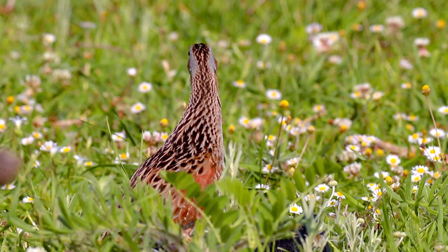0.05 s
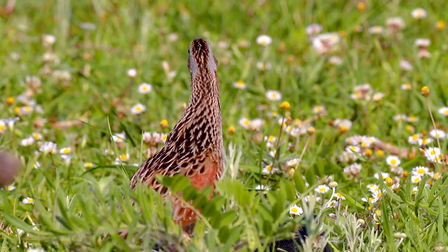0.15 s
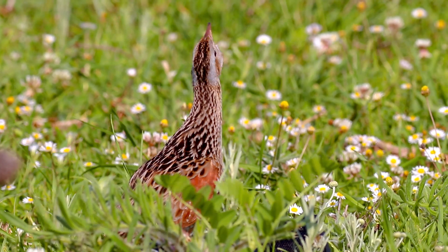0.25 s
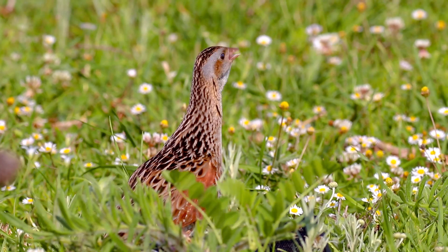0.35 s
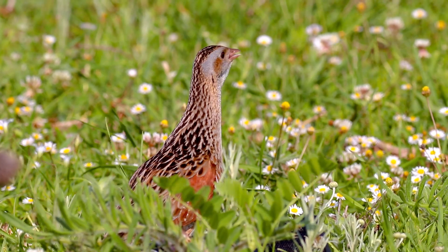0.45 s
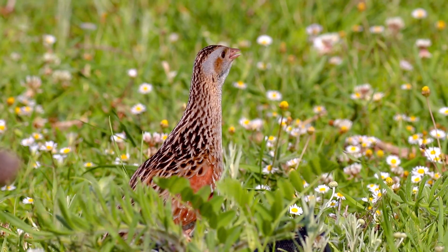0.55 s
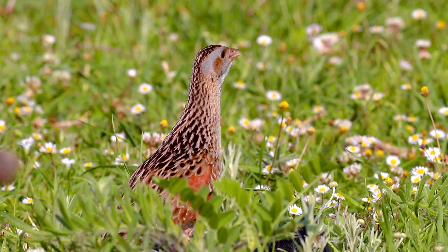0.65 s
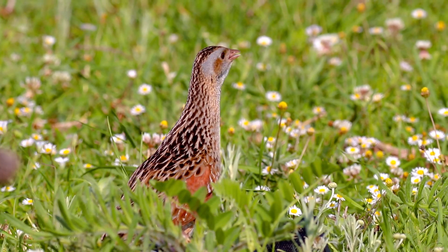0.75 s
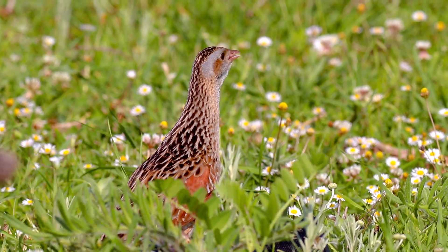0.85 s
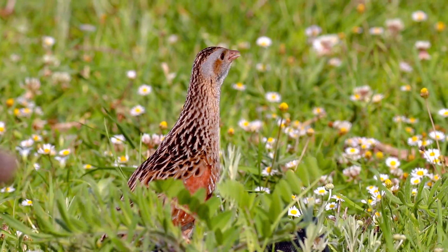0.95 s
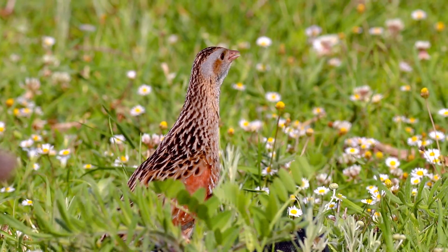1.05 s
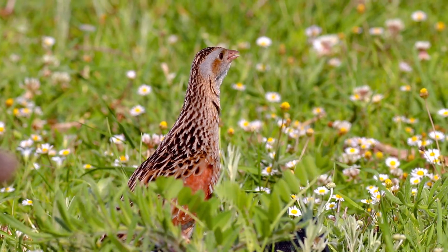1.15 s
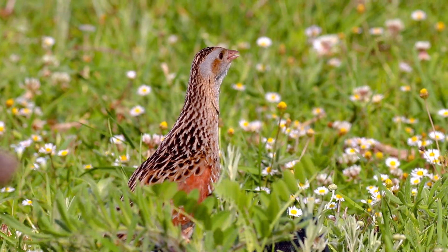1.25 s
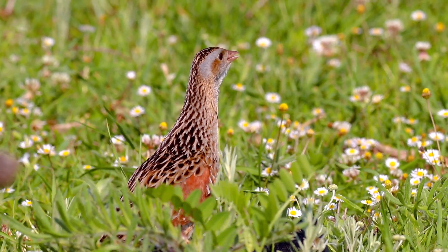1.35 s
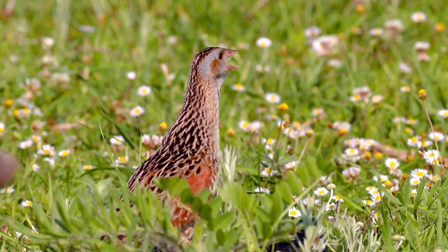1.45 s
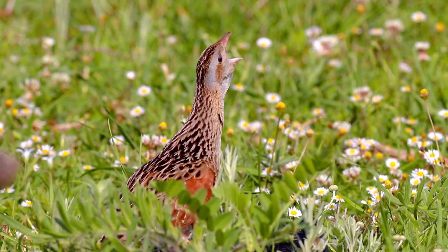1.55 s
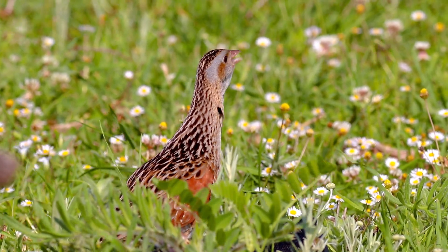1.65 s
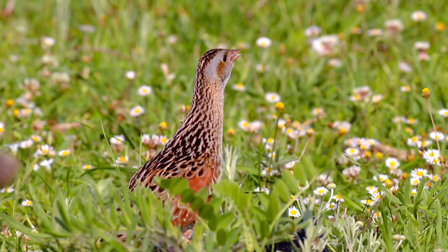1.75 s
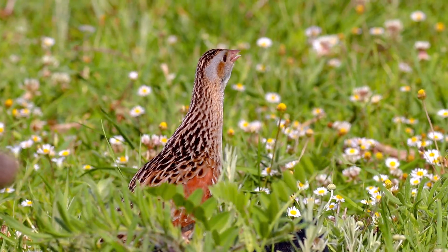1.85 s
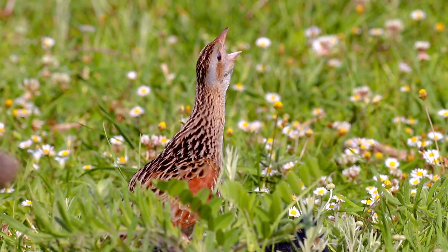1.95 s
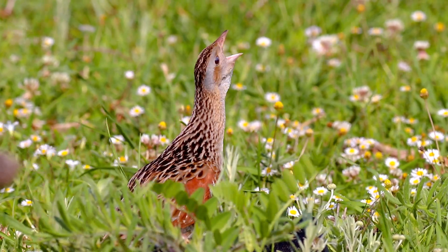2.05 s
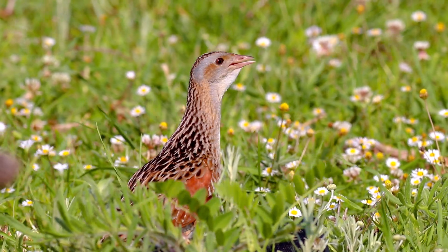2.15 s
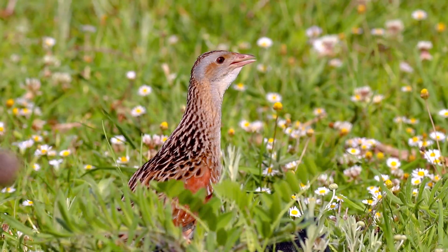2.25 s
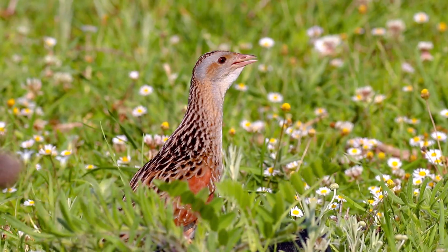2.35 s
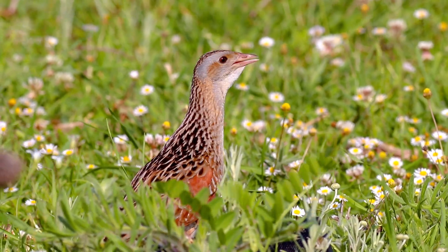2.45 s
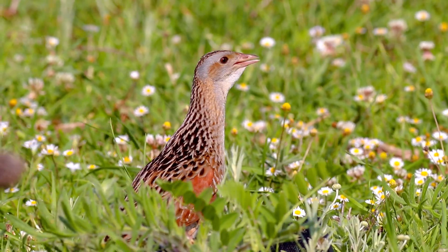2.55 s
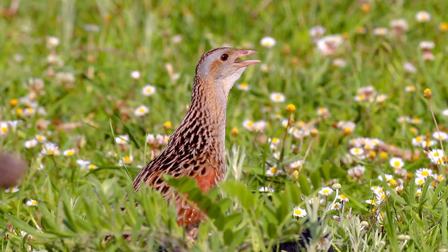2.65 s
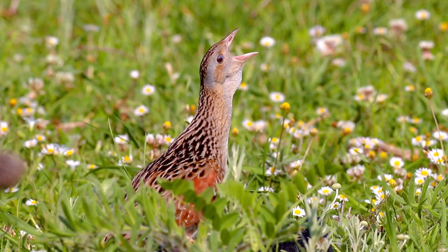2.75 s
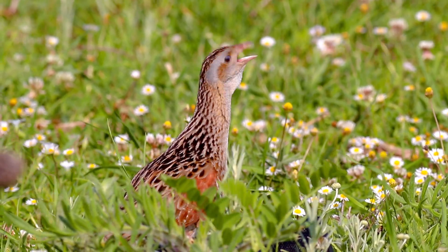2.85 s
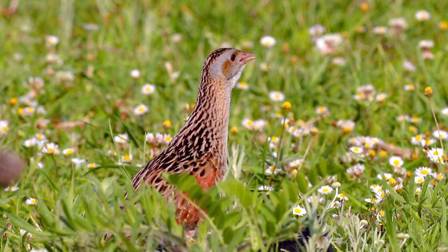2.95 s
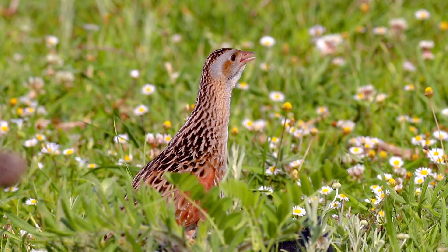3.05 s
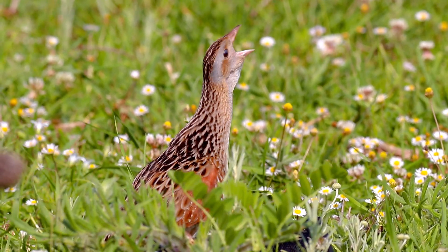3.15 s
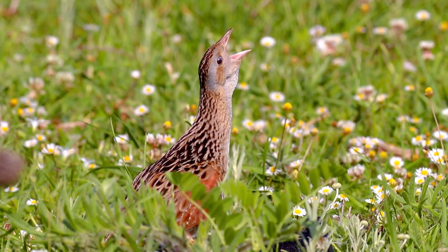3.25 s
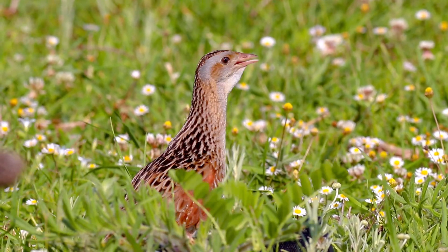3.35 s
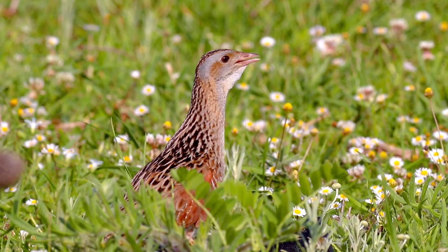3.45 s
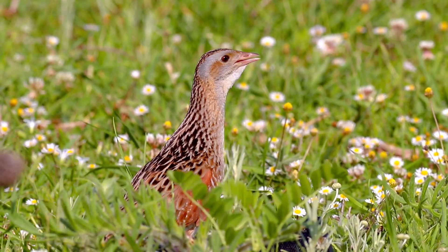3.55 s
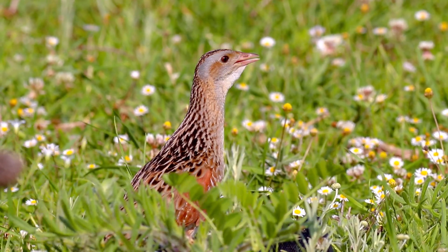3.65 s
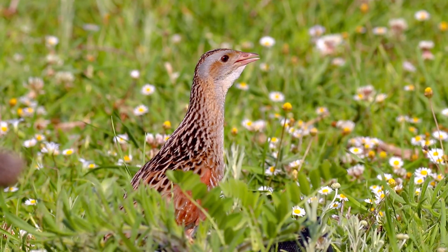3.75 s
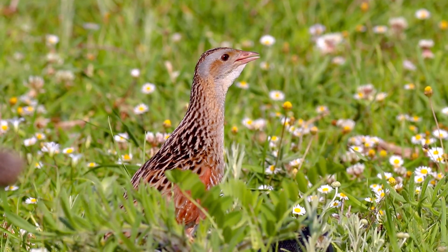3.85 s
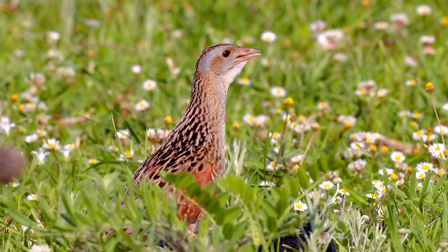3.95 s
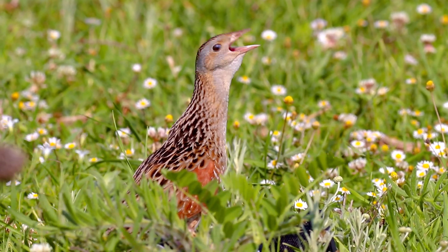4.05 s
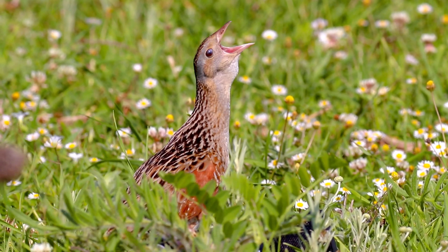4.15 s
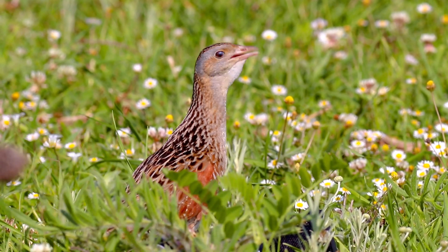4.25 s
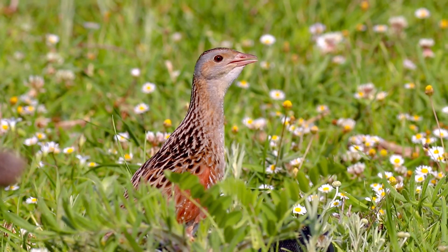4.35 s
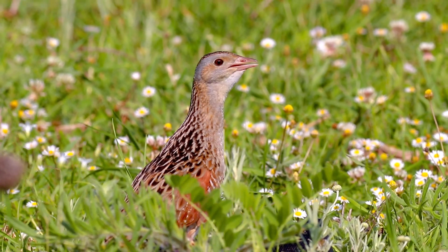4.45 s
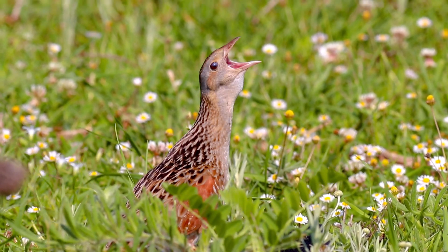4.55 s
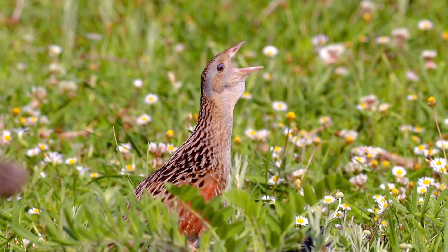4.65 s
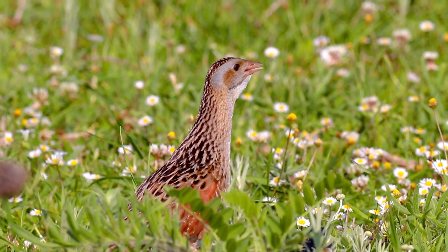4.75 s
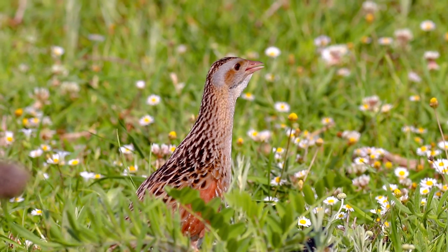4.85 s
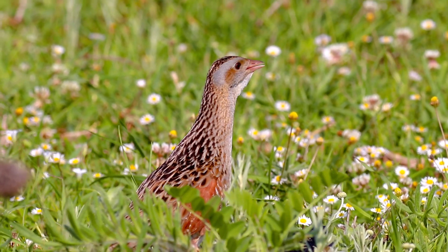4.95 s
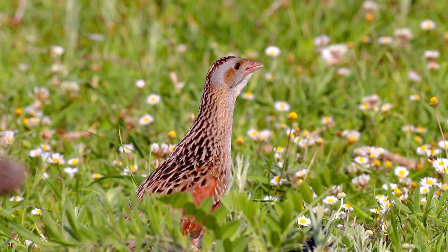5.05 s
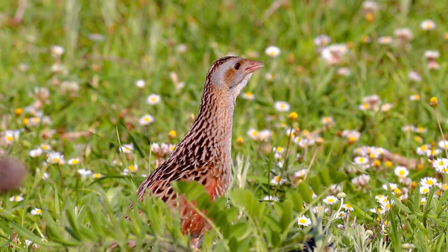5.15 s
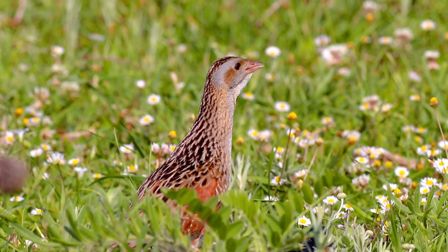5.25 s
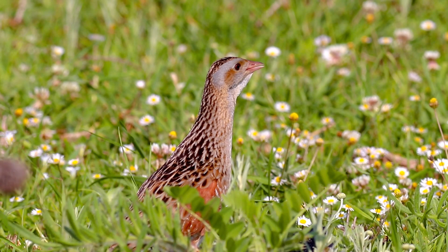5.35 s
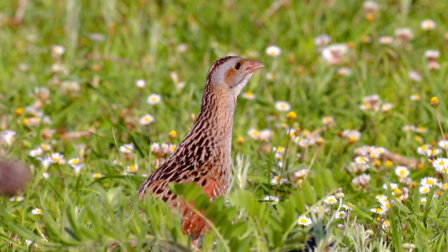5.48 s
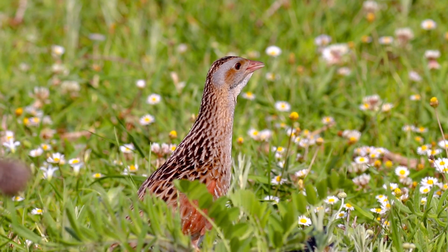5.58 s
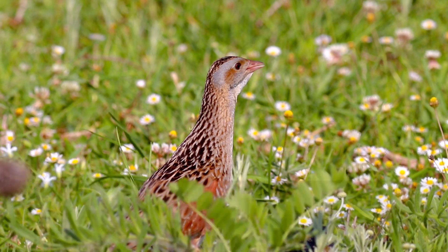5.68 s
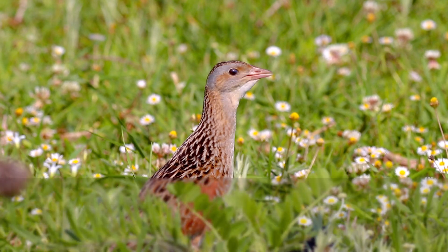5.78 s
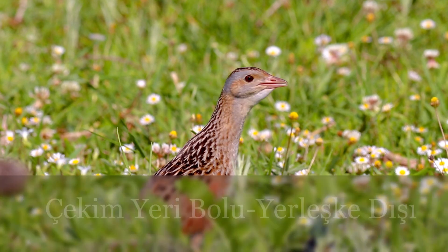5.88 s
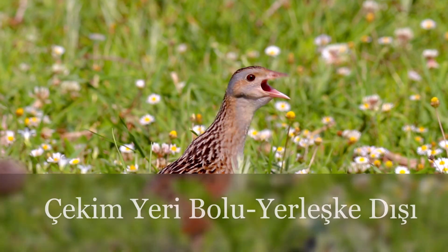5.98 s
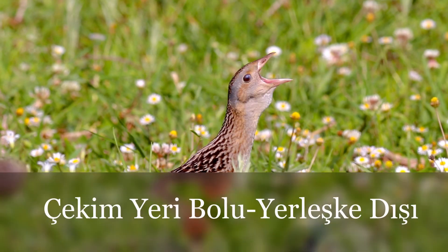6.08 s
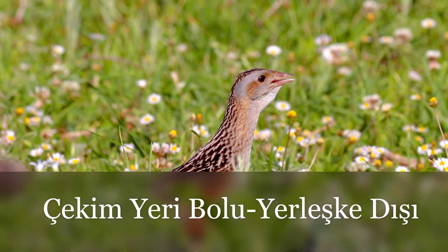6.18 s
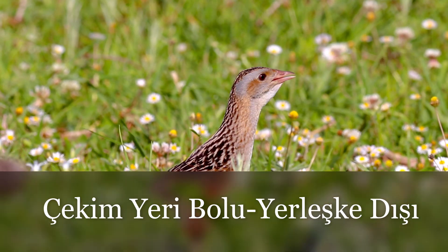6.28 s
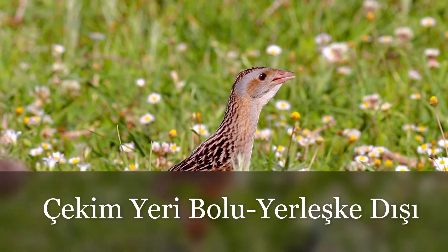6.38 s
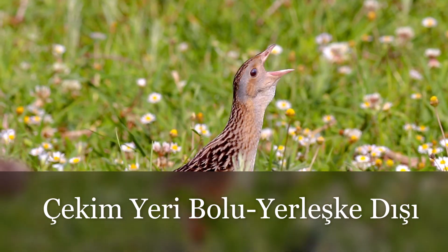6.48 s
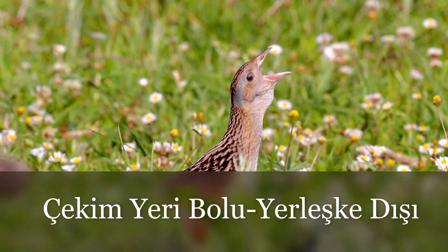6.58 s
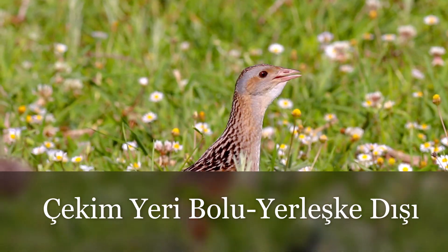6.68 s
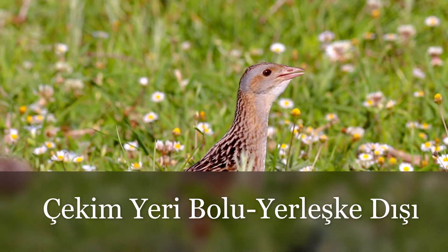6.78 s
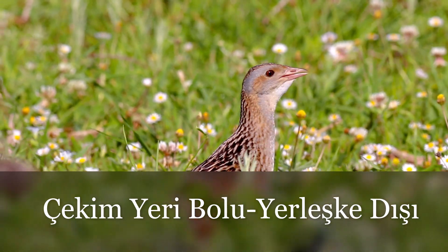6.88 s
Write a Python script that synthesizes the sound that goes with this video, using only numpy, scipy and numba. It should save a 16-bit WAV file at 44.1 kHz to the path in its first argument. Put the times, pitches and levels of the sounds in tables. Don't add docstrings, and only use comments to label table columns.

```python
import sys
import numpy as np
from scipy import signal
from scipy.io import wavfile
from scipy.ndimage import uniform_filter1d
from numba import njit

SR = 44100
rng = np.random.default_rng(int(sys.argv[2]) if len(sys.argv) > 2 else 0)


def gain_from_db(level_db):
    decades = np.asarray(level_db, float) / 20
    return 10 ** decades


def put_to_file(sound):
    columns = np.atleast_2d(sound).T
    safe = np.clip(columns, -1, 1)
    whole_steps = np.round(safe * 32767)
    wavfile.write(sys.argv[1], SR, whole_steps.astype(np.int16))


N = 305172

# [first click t/s, last click t/s, level/dB, left minus right/dB, breath/dB]
NEAR_RASPS = [
    (-.196, -.052, -0.5, -1, 0),
    (.2512, .4339, -1, -1.5, 1.5),
    (1.5549, 1.6979, -1.5, -1, 0),
    (2.0023, 2.1758, -1, -2, 0),
    (2.7663, 2.9195, 0, -2, 4),
    (3.2321, 3.4063, -1, -4, 0.5),
    (4.1564, 4.2997, 1.5, -3, 6),
    (4.6131, 4.7801, 1, -3.5, 6.5),
    (6.0653, 6.2083, 0, -4.5, 5.5),
    (6.5406, 6.7073, 1.5, -2, 4.5),
]
# [first click t/s, last click t/s, level/dB, left minus right/dB, breath/dB]
RIVAL_RASPS = [
    (5.566, 5.7367, -4, 0.5, -15),
    (6.4805, 6.6512, -8, -3, -16),
]
NEAR_PIPE_HZ = [1200, -1900, -2350, 3150, 4120, 4650, 5350, -6000, 6850, 8000]
NEAR_PIPE_MS = [0.36, 1, 0.93, 0.78, 1, 0.66, 0.55, 0.49, 0.76, 0.63]
NEAR_PIPE_DB = [-5, -3.5, 3.5, 5.5, 1.5, 4, -1.5, -1.5, 2, -9]
RIVAL_PIPE_HZ = [1500, -2420, 2890, 3530, 3980, 4640, 5290, 5650, 6780]
# [time to fullest ring/ms, level/dB]
RIVAL_PIPE = [(0.92, -11.5), (1.2, 1), (2.6, -1.5), (1.4, -1.5), (1.76, -0.5), (1.4, -6.5), (2.05, 2),
              (0.65, 3), (0.47, -2)]
# [mean gap/ms, limp/ms, clicks per limp, limp speed-up per click, clicks until the limp evens out]
NEAR_RHYTHM = (8.2, 2.4, 3, 0, 24)
RIVAL_RHYTHM = (7.7, 2.05, 3.42, .01, 500)
# [f/Hz, level/dB per Hz]
FIELD_SPECTRUM = [(35, -37), (60, -20), (113, -6), (308, -9.5), (398, -6.5), (651, -2.5), (968, -1),
                  (2190, -23), (4030, -18), (4750, -21), (7400, -24), (9570, -27.5), (16000, -36.5)]
# [f/Hz, left minus right/dB]
FIELD_PAN = [(60, 11), (110, -4), (200, 5.5), (380, -1), (700, 4), (1290, 6), (2380, -7.5), (4400, 6),
             (8120, 0), (15000, 4)]
# [t/s, level/dB]
GUST = [(0, -54.5), (1.3, -54), (1.9, -48.5), (2.2, -50.5), (2.35, -47.5), (2.65, -50), (2.9, -37.5),
        (3.05, -31.5), (3.16, -42.5), (3.4, -35), (3.45, -65), (3.85, -69), (4.3, -76), (5.4, -68),
        (5.55, -56), (6.2, -50), (6.4, -48), (6.92, -50.5)]
# [t/s, length/s, rumble level/dB, flutter level/dB]
BUFFETS = [(0.484, 0.044, -46, -52), (1.462, 0.033, -54, -63), (2.736, 0.1, -48, -64),
           (3.226, 0.047, -41, -53), (3.283, 0.019, -16, -19.5), (3.308, 0.048, -22, -21),
           (3.378, 0.016, -19.5, -32), (3.477, 0.026, -47, -50), (3.66, 0.018, -49, -50),
           (3.757, 0.054, -53.5, -39), (5.799, 0.027, -40, -56), (6.8, 0.03, -53, -46)]
# [t/s, level/dB]
LOW_CRICKET = [(0.048, -79), (0.552, -48.5), (0.805, -50.5), (1.063, -52.5), (1.305, -54.5), (1.796, -58),
               (2.324, -50), (2.514, -79), (3.022, -55), (3.534, -50), (3.831, -60), (4.485, -54.3),
               (4.862, -65), (5.034, -56)]
HIGH_CRICKET = [(0.133, -53.5), (0.639, -54), (0.857, -56), (1.098, -55), (1.448, -55), (1.891, -57),
                (2.359, -54), (2.609, -56.5), (3.081, -53), (3.574, -59), (3.823, -54.5), (4.033, -55),
                (4.491, -58), (4.864, -64), (5.053, -59), (5.953, -58)]
# [t/s, length/s, from f/Hz, to f/Hz, level/dB]
WHISTLES = [(1.318, .013, 6200, 5300, -50), (1.345, 0.0076, 6260, 5300, -45),
            (1.373, 0.008, 6300, 5500, -47), (2.454, 0.019, 6300, 6330, -50),
            (2.498, .028, 6450, 6420, -54), (3.985, 0.025, 4600, 3250, -50), (5.4, 0.0087, 7700, 7760, -50),
            (5.509, .013, 4870, 4750, -49), (5.555, 0.007, 2600, 2730, -36),
            (6.668, 0.0065, 3560, 3540, -8)]
# [t/s, length/s, from f/Hz, to f/Hz, level/dB]
TRILLS = [(5.237, 0.044, 5200, 4430, -30), (5.237, 0.032, 3560, 3470, -35.5), (6.369, .06, 3620, 3750, -39),
          (6.375, 0.038, 4970, 4720, -36.5), (6.41, 0.028, 3850, 3430, -30.5),
          (6.414, 0.049, 3220, 3120, -32), (6.715, 0.07, 2740, 2990, -29.5),
          (6.905, 0.026, 2800, 2950, -35.5)]
# [t/s, length/s, from f/Hz, to f/Hz, level/dB]
BUZZES = [
    (5.747, 0.049, 4160, 4420, -30.5),
    (6.849, 0.045, 3750, 3900, -30.5),
]
# [t/s, length/s, level/dB]
CHIPS = [(4.019, 0.018, -40), (4.139, 0.011, -36.5), (4.493, 0.015, -39.5), (4.897, 0.01, -42),
         (4.925, 0.021, -39), (5.064, 0.015, -37.5), (5.098, 0.017, -36.5), (5.495, 0.0087, -44),
         (5.521, 0.026, -39.5), (5.953, 0.013, -38.5)]
# [t/s, level/dB]
TAPS = [
    (5.503, -43),
    (5.542, -25.5),
]


def level(x, db):
    return x * gain_from_db(db) / np.sqrt(np.mean(x ** 2))


def band(x, lo_hz, hi_hz, order=2):
    return signal.sosfilt(signal.butter(order, [lo_hz, hi_hz], "bandpass", fs=SR, output="sos"), x)


def pan(x, db):
    return x * gain_from_db(np.array([[db / 2], [-db / 2]]))


def add(out, s, x):
    i = int(s * SR)
    out[:, i:i + x.shape[1]] += x[:, :out.shape[1] - i]


def walk(rate):
    k = int(SR / rate)
    steps = np.repeat(rng.standard_normal(N // k + 1), k)
    return 1.3 * uniform_filter1d(uniform_filter1d(steps, k), k)[:N]


def scatter(x, delay_s, rise_s, t60_s, alike, size):
    t = np.arange(size) / SR - delay_s
    shape = np.clip(t / rise_s, 0, 1) * np.exp(-np.log(1000) * np.maximum(t, 0) / t60_s)
    noise = rng.standard_normal((3, size))
    response = level(shape * (alike * noise[0] + noise[1:]), 0) / np.sqrt(size)
    return signal.fftconvolve(x, response, axes=1)[:, :x.shape[1]]


def rhythm(mean_ms, limp_ms, clicks, speed_up, even_after, limp_deg, rush_ms):
    k = np.arange(30)
    turn = 2 * np.pi * (k / clicks + speed_up * k ** 2 / 2) + np.radians(limp_deg)
    limp = limp_ms * np.exp(-k / even_after) * np.cos(turn)
    return mean_ms + limp - rush_ms * np.exp(-k / 1.5)


def click(hz, ms, mode_db, vary_db, soft, crack_db, puff_db, place, offset_s):
    chance = rng.standard_normal((2, len(hz), 1))
    t = np.maximum(np.arange(800) / SR - offset_s, 0)
    late = np.maximum(t * 1000 - 700 / np.abs(hz), 0) / ms
    swell = (late * np.exp(1 - late)) ** soft
    gain = gain_from_db(mode_db + vary_db * chance[0])
    ring = np.sum(gain * swell * np.sin(2 * np.pi * hz * (1 + .015 * chance[1]) * t), axis=0)
    snap = t / .00025 * np.exp(-t / .00025)
    crack = gain_from_db(crack_db - 5 * place ** .4) * snap * np.sin(2 * np.pi * 5300 * t)
    air = rng.standard_normal((3, 800))
    hiss = band(air[1:] + 0.49 * air[0], 4000, 13700)
    puff = gain_from_db(puff_db) * t / 0.00049 * np.exp(-t / 0.0012) * hiss
    return ring + crack + pan(puff, 4)


def crake(rasps, mean_ms, tilt, gaps, hz, pipe, db, fade_db, crack_db, hiss_db, vary_db, tire_ms, soft):
    out = np.zeros((2, N + SR))
    hz = np.array(hz)[:, None]
    ms, mode_db = np.transpose(pipe)[:, :, None]
    for first, last, rasp_db, pan_db, breath_db in rasps:
        n = int((last - first) * 1000 / mean_ms) + 1
        k = np.arange(n)
        bright_db = (tilt + 0.0338 * breath_db) * (np.abs(hz) / 1000 - 14)
        pose_db = 1.5 * rng.standard_normal((len(pipe), 1))
        gap = np.array(gaps[:n - 1]) + tire_ms * np.exp((k[1:] - n + 1) / 1.407)
        times = 1 + first + (last - first) * np.append(0, np.cumsum(gap)) / gap.sum()
        for s, place in zip(times, k / (n - 1)):
            sound = click(hz, ms, mode_db + bright_db + pose_db, vary_db, soft, crack_db,
                          hiss_db + breath_db, place, s % (1 / SR))
            add(out, s, pan(sound * gain_from_db(db + rasp_db + fade_db * place ** 6), pan_db))
    return band(out, 1148, 13000, order=4)


def crakes():
    near_gaps = rhythm(*NEAR_RHYTHM, limp_deg=138, rush_ms=.45)
    near = crake(NEAR_RASPS, NEAR_RHYTHM[0], 0.33, near_gaps, NEAR_PIPE_HZ,
                 list(zip(NEAR_PIPE_MS, NEAR_PIPE_DB)), db=-8, fade_db=-2.8, crack_db=13, hiss_db=-16.5,
                 vary_db=2.5, tire_ms=1.7, soft=1.4)
    rival_gaps = rhythm(*RIVAL_RHYTHM, limp_deg=127, rush_ms=1.2)
    rival = crake(RIVAL_RASPS, RIVAL_RHYTHM[0], .01, rival_gaps, RIVAL_PIPE_HZ, RIVAL_PIPE, db=-20,
                  fade_db=-2, crack_db=-35, hiss_db=-60, vary_db=3.5, tire_ms=0.63, soft=3.7)
    far = band(rival, 1360, 9200, order=3)
    lead_in = gain_from_db(-17) * np.roll(band(near + far, 2500, 4900, order=1), -int(.0017 * SR), axis=1)
    stems = gain_from_db(-10) * scatter(band(near, 6200, 13000, order=1), .0002, .0006, .009, 0, size=900)
    stems += gain_from_db(-9) * scatter(near, .0004, .002, .026, .1, size=3000)
    stems += gain_from_db(-4) * scatter(far, .0008, .002, .05, .7, size=4000)
    bank = gain_from_db(-30.5) * np.roll(band(near, 1700, 7500), int(.0172 * SR), axis=1)
    to_trees = band(near + gain_from_db(-3.0) * far, 3700, 14000, order=1)
    trees = gain_from_db(-29) * scatter(to_trees, 0.14, 0.081, 0.38, 0.067, size=26000)
    return (near + far + lead_in + stems + bank + trees)[:, SR:]


def field():
    out, swell = 0, walk(0.32)
    hz_at, db_at = np.transpose(FIELD_SPECTRUM)
    for hz in 70 * 2 ** np.arange(0, 8, .5):
        mid, side = band(rng.standard_normal((2, N)), hz / 2 ** 0.3, min(hz * 2 ** 0.2, .45 * SR))
        db = np.interp(np.log(hz), np.log(hz_at), db_at) + .8 * swell + 1.1 * walk(9)
        wide = mid + 0.76 * side * np.array([[1], [-1]])
        out = out + gain_from_db(db) * pan(wide, np.interp(hz, *np.transpose(FIELD_PAN)))
    return level(out, -43)


def wind():
    t = np.arange(N) / SR
    gust_db = np.interp(t, *np.transpose(GUST))
    over_calm_db = gust_db + 53
    rumble_gain = gain_from_db(gust_db)
    flutter_gain = gain_from_db(-53 + 0.26 * over_calm_db)
    for s, seconds, rumble_db, flutter_db in BUFFETS:
        bump = np.exp(-(2 * (t - s) / seconds) ** 2)
        rumble_gain = rumble_gain + gain_from_db(rumble_db) * bump
        flutter_gain = flutter_gain + gain_from_db(flutter_db) * bump
    air = rng.standard_normal((3, 3, N))
    shared = np.stack([np.roll(air[:, 0], 12, axis=1), air[:, 0]], axis=1)
    air = air[:, 1:] + .9 * shared
    rumble = level(gain_from_db(1.2 * walk(14)) * band(air[0], 65.4, 163), 0)
    flutter = level(gain_from_db(2.3 * walk(25)) * band(air[1], 146, 343), 0)
    thud = level(band(air[2], 9.3, 68), 0) * gain_from_db(-62 + 1.59 * over_calm_db)
    return pan(rumble_gain * rumble + flutter_gain * flutter + thud, -1)


def tone(seconds, from_hz, to_hz, trill, sweep_hz, bend):
    t = np.arange(int(seconds * SR)) / SR
    stroke = t * trill % 1
    hz = from_hz + (to_hz - from_hz) * (t / seconds) ** bend + sweep_hz * (.5 - stroke)
    phase = 2 * np.pi * np.cumsum(hz) / SR
    shape = np.sin(np.pi * t / seconds) ** 0.28
    if trill:
        shape = shape * np.sin(np.pi * stroke) ** 1.1
    return shape * np.sin(phase), shape * np.sin(2 * phase)


def crickets():
    out = np.zeros((2, N))
    for chirps, hz, sag_hz, pan_db in [(LOW_CRICKET, 4950, 480, 3.0), (HIGH_CRICKET, 5260, 200, -3.0)]:
        for s, db in chirps:
            for k, stroke_db in enumerate([3.5, 3.0, 3.0, -26]):
                stroke = tone(0.0177, hz, hz - sag_hz, 0, 0, 2.13)[0]
                add(out, s + .031 * k, pan(gain_from_db(db + stroke_db + 3.0) * stroke, pan_db))
    shimmer = gain_from_db(1.1 * walk(44) + 0.47 * walk(5.3))
    chorus = shimmer * band(rng.standard_normal((2, N)), 4770, 5080)
    return out + gain_from_db(-5) * scatter(out, .002, .004, .1, .1, size=5000) + level(chorus, -55)


def songbirds():
    out = np.zeros((2, N))
    for notes, trill, sweep_hz in [(WHISTLES, 0, 0), (TRILLS, 135, 550), (BUZZES, 160, 1500)]:
        for s, seconds, from_hz, to_hz, db in notes:
            note = tone(seconds, from_hz, to_hz, trill, sweep_hz, 1.08)[0]
            pan_db = -6 * (from_hz < 3750)
            add(out, s, pan(gain_from_db(db) * note, pan_db))
    for s, seconds, db in CHIPS:
        first, second = tone(seconds, 4380, 3850, 0, 0, 3.2)
        add(out, s, pan(gain_from_db(db) * (first + gain_from_db(-12.5) * second), 0.51))
    return out + gain_from_db(-4) * scatter(out, .003, .004, .11, .2, size=6000)


def taps():
    out, t = np.zeros((2, N)), np.arange(600) / SR
    for s, db in TAPS:
        tick = 0.48 * np.exp(-t / 0.0019) * band(rng.standard_normal(600), 1500, 6700, order=1)
        ring = np.exp(-t / 0.0034) * np.sin(2 * np.pi * 950 * t)
        add(out, s, pan(gain_from_db(db) * (tick + ring), 0))
    return out


def scene():
    return crakes() + field() + wind() + crickets() + songbirds() + taps()


@njit
def follow(x, attack, release):
    e, y = 0., np.empty(len(x))
    for i in range(len(x)):
        e += (x[i] - e) * (attack if x[i] > e else release)
        y[i] = e
    return y


def roll_off(x):
    return signal.sosfilt(signal.butter(12, 16500, fs=SR, output="sos"), x)


def record(dry):
    heard = follow(np.abs(dry).max(axis=0), 1 / (0.00083 * SR), 1 / (.06 * SR))
    gain = np.minimum(1, gain_from_db(-14.5) / (heard + 1e-9)) ** 0.66
    fade = np.clip(np.abs(np.arange(N) / SR - 5.464) / .026, .03, 1) ** 1.3
    rounded = .95 * np.tanh(dry * gain * fade / .95)
    top = signal.ellip(8, .3, 60, 15600, fs=SR, output="sos")
    return roll_off(signal.sosfilt(top, rounded))


dry = scene()
out = record(dry)
put_to_file(out)
```